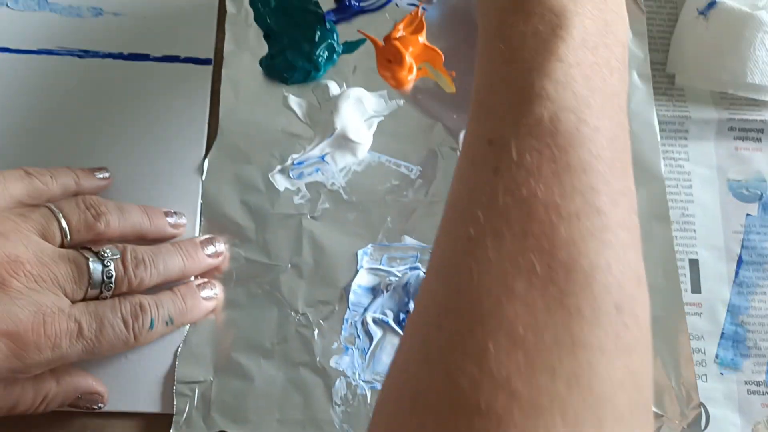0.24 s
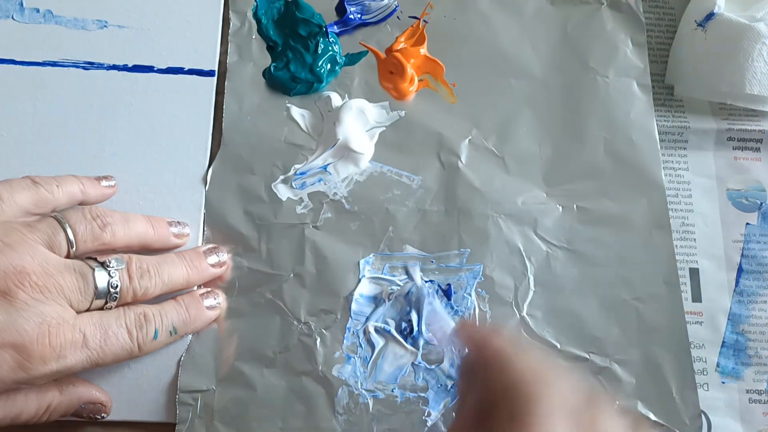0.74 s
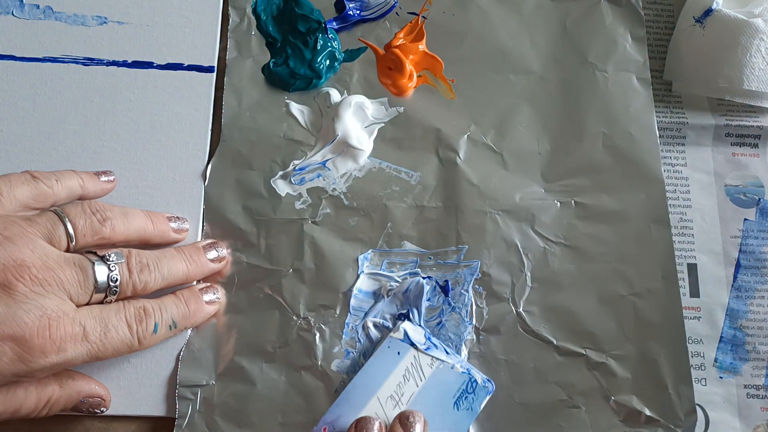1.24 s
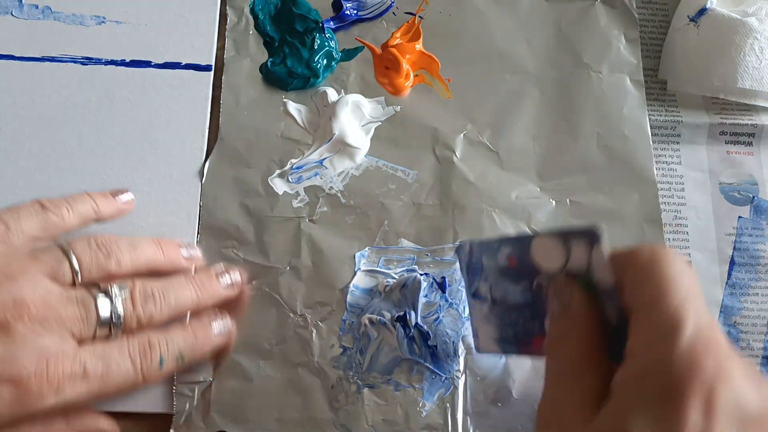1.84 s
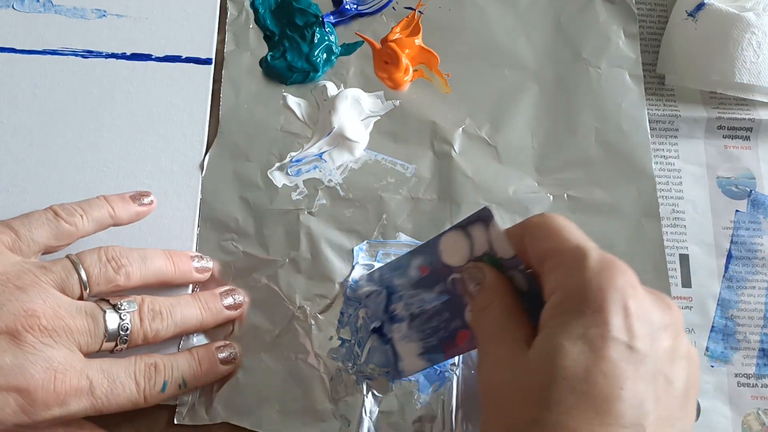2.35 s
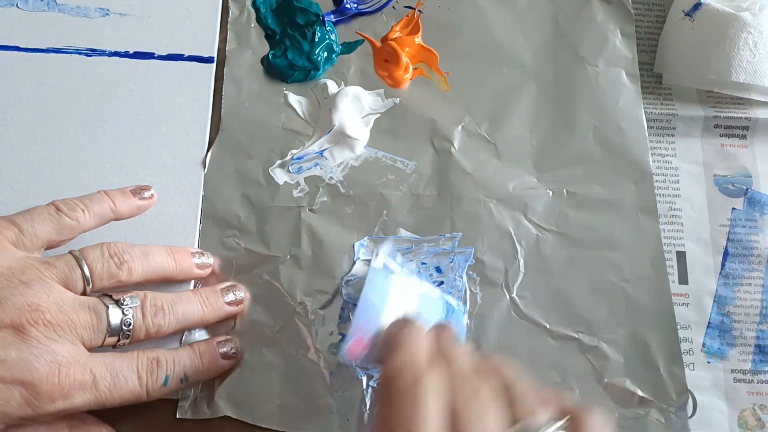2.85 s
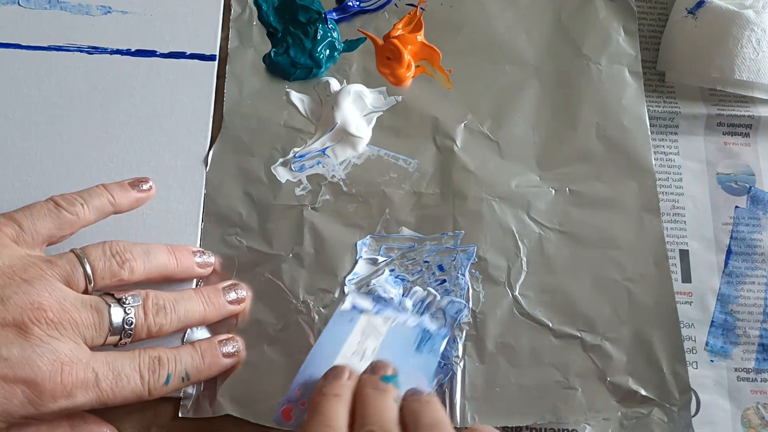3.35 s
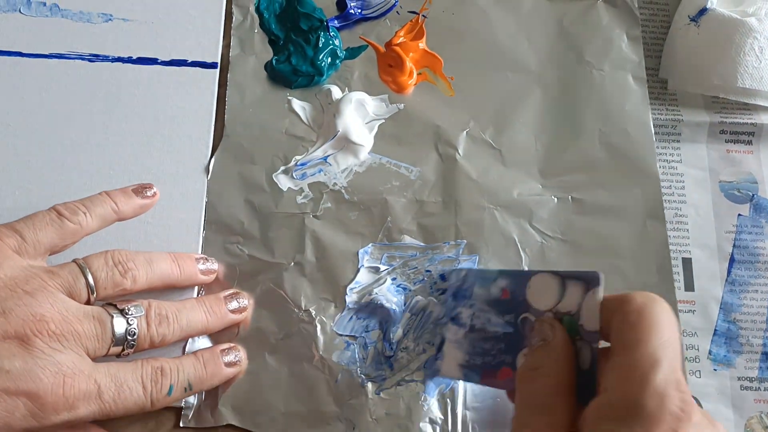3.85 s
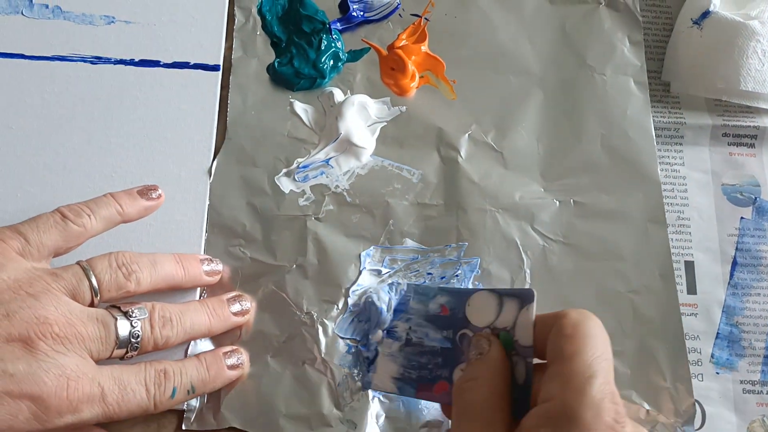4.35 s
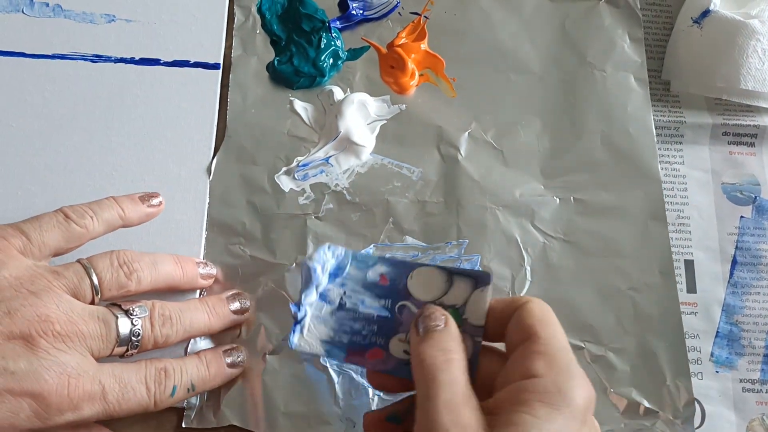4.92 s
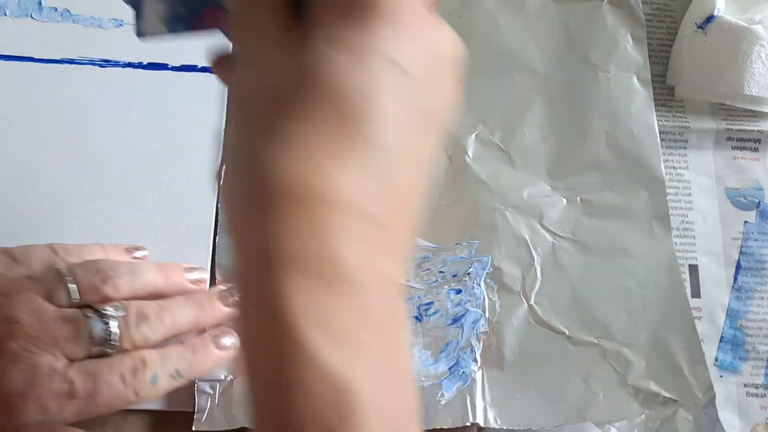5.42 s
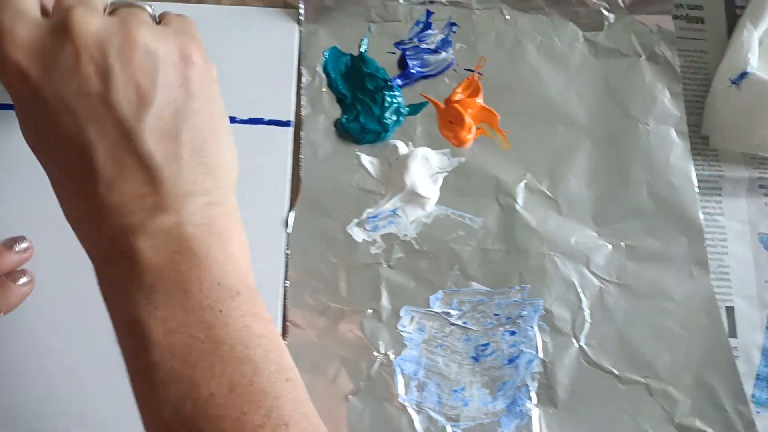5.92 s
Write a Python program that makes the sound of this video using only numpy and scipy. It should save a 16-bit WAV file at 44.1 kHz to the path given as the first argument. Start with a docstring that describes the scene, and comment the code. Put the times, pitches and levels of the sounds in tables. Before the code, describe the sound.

Foil buckles and crackles under a plastic card pushing wet paint over it, on a table indoors, heard from close by with short, tight reflections. Small rustles come first, then faint rubbing, then bursts of crisp snapping that build and stop abruptly as the card lifts. Dull clacks and tiny squeaks mix in. After the busiest run of snaps comes one last hard scuff, then only sticky ticks, low room rumble and faint hum.

```python
"""In a small room, a plastic card scrapes wet paint off a sheet of aluminium foil on a table.
In each stroke the card bites, presses harder or eases off, and lifts. The foil buckles in loud snaps
and a fine crackle, made of decaying noise bursts with a ring; the card's edge adds a duller rub of
ringing catches, and taps, squeaks, brushes and sticky ticks are resonated noise.
Decaying noise stands for the reflections; mains hum and a low rumble lie underneath."""
import sys
import numpy as np
from scipy import signal
from scipy.fft import rfft, irfft
from scipy.io import wavfile
from scipy.ndimage import uniform_filter1d

SR = 44100
rng = np.random.default_rng(int(sys.argv[2]) if len(sys.argv) > 2 else 0)


def to_wav(s):
    """Save 16-bit WAV."""
    ch = np.atleast_2d(s).T  # columns
    pcm = np.round(np.clip(ch, -1, 1) * 32767)  # PCM
    wavfile.write(sys.argv[1], SR, pcm.astype(np.int16))


N = 272538
TIME = np.arange(N) / SR  # s

# Strokes of the card. Each row: start in seconds, length in seconds, relative crackle level in dB,
# relative rub level in dB, change of pressure from start to end in dB.
CARD_STROKES = [(0.0, 0.012, -29, -32, -8.5), (0.073, 0.043, -33, -32, 5), (0.232, 0.066, -48.5, -36.5, -5),
                (0.32, 0.02, -36, -30.5, 2.5), (1.039, 0.1, -66, -50, -24), (1.14, 0.15, -63.5, -42.5, 3.5),
                (1.375, 0.21, -56, -39, 1.5), (1.658, 0.068, -24.5, -30, -10), (1.795, 0.13, -45, -72, 7),
                (1.973, 0.16, -29, -35, 12), (2.193, 0.085, -30, -29.5, -3), (2.332, 0.14, -49, -42, 4),
                (2.422, 0.13, -45, -36, -10), (2.609, 0.023, -31.5, -30, -0.5),
                (2.986, 0.165, -33.5, -41.5, -9), (3.188, 0.09, -48, -35, 3),
                (3.502, 0.027, -39.5, -30, -2), (3.575, 0.026, -50.5, -33, 13.5),
                (3.96, 0.071, -31, -29, -5.5), (4.067, 0.098, -37.5, -38, 5),
                (4.215, 0.18, -52, -50.5, 3.5), (4.383, 0.31, -45, -37.5, 7.5), (4.735, 0.085, -44, -44, 0),
                (4.839, 0.17, -40, -35.5, 16.5), (5.03, 0.13, -49.5, -42.5, -8),
                (5.12, 0.16, -28.5, -30.5, 5.5), (5.229, 0.033, -23.5, -24, -5.5),
                (5.416, 0.065, -42, -44, 10), (5.54, 0.045, -44.5, -32.5, -5.5),
                (5.937, 0.11, -72, -64.5, -11)]
# The sound builds as the card takes hold and dies quickly once it lifts.
BITE_DB_PER_S, LIFT_DB_PER_S = 1291, 528
# Then the sheet relaxes with a faint, slower rustle.
SETTLE_DB, SETTLE_DB_PER_S = -19.5, 130.5

# The loudest creases that snap through. Each row: start in seconds, relative level in dB.
LOUD_SNAPS = [(0.018, -15), (1.257, -21), (1.4508, -23.5), (1.497, -18), (1.6556, -8.5), (1.665, -6),
              (1.837, -15.5), (1.8802, -22.5), (1.981, -13.5), (2.027, -17), (2.0768, -10), (2.091, -7),
              (2.1011, -12.5), (2.1306, -10.5), (2.1705, -18.5), (2.217, -14), (2.357, -27),
              (2.4625, -12.5), (2.4885, -9.5), (2.5285, -8), (2.5535, -16), (2.5721, -9), (2.5947, -17),
              (2.663, -10.5), (2.9836, -14.5), (3.054, -12.5), (3.0853, -9.5), (3.1003, -26), (3.119, -10),
              (3.178, -20), (3.1926, -17.5), (3.2151, -25), (3.2452, -14), (3.494, -24.5), (3.5142, -6),
              (3.531, -20), (3.591, -24), (3.6073, -15), (3.9969, -6.5), (4.0332, -5.5), (4.0897, -12.5),
              (4.1405, -20.5), (4.2643, -15), (4.3735, -22), (4.392, -15), (4.4164, -10), (4.4381, -11.5),
              (4.4508, -12), (4.468, -13.5), (4.496, -5.5), (4.5013, -4.5), (4.5334, -19), (4.5494, -24),
              (4.5703, -3.5), (4.6363, -13.5), (4.672, -14.5), (4.744, -23), (4.8184, -9), (4.836, -12.5),
              (4.883, -10), (4.902, -16), (4.919, -7.5), (4.927, -12.5), (4.9811, -10.5), (5.0002, -15),
              (5.101, -14.5), (5.132, -11), (5.1466, -8.5), (5.1616, -8.5), (5.2113, -20), (5.4474, -11)]
# Buckles that run on through their neighbours. Each row: start in seconds, relative level of the
# first crease in dB.
BUCKLE_CASCADES = [(0.079, -15.5), (0.1197, -16), (0.2593, -16), (1.5354, -18), (1.587, -5.5),
                   (2.6437, -11.5), (4.872, -13), (5.2356, -6), (5.471, -15.5)]
CASCADE_GAP_S, CASCADE_DB_PER_S = 0.002, 598  # mean gap; the later a crease, the weaker
# The card's resonance, wandering with its grip and angle. Each row: time in seconds, mean pitch in Hz.
CARD_RESONANCE = [(0.3, 3410), (1.45, 2580), (1.7, 3350), (2.55, 3710), (3.0, 2810), (3.7, 2300),
                  (4.5, 3520), (4.7, 2705), (5.55, 2440)]
# Dull taps of card and fingers on the foil. Each row: start in seconds, relative level in dB, pitch in Hz.
FOIL_TAPS = [(0.239, -24.5, 2440), (1.0293, -27, 1170), (1.0297, -20.5, 1680), (1.267, -26, 2900),
             (1.378, -25, 2305), (1.393, -28, 2200), (1.408, -25.5, 2080), (2.097, -14, 854),
             (2.165, -18, 1080), (2.333, -22.5, 2030), (2.986, -11, 2340), (3.932, -22.5, 2200),
             (4.3015, -28, 1700), (4.819, -16, 1270), (5.539, -23, 2490)]
# Short squeaks of the card's edge. Each row: start in seconds, relative level in dB, pitch in Hz.
EDGE_SQUEAKS = [(1.178, -34.5, 3130), (1.31, -37, 2460), (2.265, -24, 2230), (2.427, -29, 2410),
                (3.366, -37, 2640), (3.71, -39, 2700)]
# Card and fingers barely brush the foil. Each row: start in seconds, relative level in dB, pitch in Hz.
LIGHT_BRUSHES = [(0.688, -49.5, 7400), (3.783, -47, 8550)]
# Small sticky ticks of wet paint. Each row: start in seconds, relative level in dB, pitch in Hz.
PAINT_TICKS = [(0.6664, -50, 6600), (0.9675, -52.5, 5400), (2.9325, -48, 5960), (5.686, -32.5, 9600),
               (5.7375, -31, 5700)]

# Filter for the bright foil. Each row: frequency in Hz, gain in dB.
FOIL_SPECTRUM = [(150, -48), (600, -22.5), (850, -19.5), (1150, -14), (1700, -4.5), (2500, -0.5),
                 (16000, -2)]
# Filter for the duller rub and taps. Each row: frequency in Hz, gain in dB.
RUB_SPECTRUM = [(200, -80), (750, -24.5), (1200, -15.5), (2300, -4.5), (6500, -1.5), (16000, -22.5)]
# Decay of the room. Each row: frequency in Hz, time to fall by 60 dB in seconds.
ROOM_DECAY = [(5600, 0.25), (14700, 0.11)]
# Filter for the room's reflections. Each row: frequency in Hz, gain in dB.
ECHO_SPECTRUM = [(300, -6), (2500, 0), (6500, -3), (16000, -2)]
# Spectrum of the room's rumble and hiss. Each row: frequency in Hz, relative level in dB.
RUMBLE_SPECTRUM = [(20, -3.5), (125, -11.5), (220, -9), (350, -17), (800, -25.5), (2000, -26.5),
                   (3300, -35), (16000, -46)]
# Left-right likeness of the rumble. Each row: frequency in Hz, likeness from 0 to 1.
RUMBLE_LIKENESS = [(25, .3), (100, 0.8), (300, 0.83), (1500, 0.14)]
# Mains hum. Each row: frequency in Hz, rms level at the microphones in dB.
MAINS_HUM = [(100, -66), (200, -70.5), (300, -74.5)]
# The ports of the two microphones resonate at different pitches. Each row: frequency in Hz, gain in dB.
LEFT_PORT = [(700, 0), (1100, -1), (2100, 4.5), (2570, 5), (2950, 0), (5200, 3.5), (6000, 9), (6800, 8.5),
             (7700, 0.5), (8500, -7), (9700, 4.5), (13000, 3.5), (14200, 10.5)]
RIGHT_PORT = [(700, 0), (1200, 3), (2000, -8.5), (2700, -2.5), (3500, 4), (4800, -2), (6600, -5),
              (7900, 4.5), (10000, 5.5), (12500, -1), (14200, -8.5), (16000, -19.5)]
EDGE_HZ = 15950  # upper band limit of the recorder


def pressure(start, length, change_db):
    """Stick and release: the level in dB climbs at the bite, slopes while held, and falls in two stages."""
    before = np.maximum(start - TIME, 0)
    after = np.maximum(TIME - start - length, 0)
    hold_db = change_db * (np.clip((TIME - start) / length, 0, 1) - .5)
    release_db = np.maximum(-LIFT_DB_PER_S * after, SETTLE_DB - SETTLE_DB_PER_S * after)
    return hold_db + release_db - BITE_DB_PER_S * before


def drag():
    """Frictional drive: the strongest stroke rules at each moment; returns crackle and rub gains."""
    drive_db = np.full((2, N), -np.inf)
    for start, length, crackle_db, rub_db, change_db in CARD_STROKES:
        stroke_db = np.array([[crackle_db], [rub_db]]) + pressure(start, length, change_db)
        drive_db = np.maximum(drive_db, stroke_db)
    return gain_of(drive_db)


def crease(t60, low_hz=2500, high_hz=15000, width_hz=900, crack_db=5, crack_s=0.0037,
           rise_s=0.00033, ring_db=6, size=4000):
    """Snap-through buckling: a facet cracks, rings at its own pitch, and scatters waves in the sheet."""
    t = np.arange(size) / SR
    scatter = gain_of(-60 * t / t60)
    crack = gain_of(crack_db) * np.exp(-t / crack_s)
    shape = (scatter + crack) * (1 - np.exp(-t / rise_s))
    burst = pair(size) * shape / shape.max()
    pitch_hz = low_hz * (high_hz / low_hz) ** rng.random()
    return burst + gain_of(ring_db) * facet(burst, pitch_hz, width_hz)


def snaps(level_db=-11.0, crack_db=7, ring_db=7, count=10):
    """Cascading instability: loud creases snap alone or set off a run of weaker neighbours."""
    out = np.zeros((2, N))
    creases = list(LOUD_SNAPS)
    for s, db in BUCKLE_CASCADES:
        delays = CASCADE_GAP_S * (np.arange(count) + rng.random(count) - .5).clip(0)
        creases += [(s + delay, db - CASCADE_DB_PER_S * delay) for delay in delays]
    for s, db in creases:
        t60 = rng.uniform(.014, .034)
        add(out, s, gain_of(db) * crease(t60, crack_db=crack_db, ring_db=ring_db))
    return gain_of(level_db) * colour(out, FOIL_SPECTRUM)


def crinkle(per_s, spread_db, creases, spectrum, size=1500):
    """Crackling noise: small creases at random times, mostly faint and a few large, partly levelled."""
    out = np.zeros((2, N))
    for when, luck, kind in rng.random((int(per_s * N / SR), 3)):
        gain = gain_of(-spread_db * np.log(luck + 0.11))
        add(out, when * N / SR, gain * creases[int(kind * len(creases))])
    out = evened(colour(out, spectrum))
    # the card releases strain at a steady pace: a large crease relieves its neighbours
    local_power = uniform_filter1d((out ** 2).mean(0), size)
    return out / np.sqrt(local_power + 0.023)


def crackle(drive, level_db=-2.5, per_s=260, spread_db=7.5, count=60):
    """Fine buckling: bright little creases give way as the paint drags the foil along."""
    creases = [crease(rng.uniform(.008, .026), size=1500) for _ in range(count)]
    return gain_of(level_db) * crinkle(per_s, spread_db, creases, FOIL_SPECTRUM) * drive


def rub(drive, level_db=-4.5, per_s=150, spread_db=8.0, t60=0.038, card_db=1, card_width_hz=700, count=60):
    """Friction and forced resonance: the edge catches on dull-ringing wrinkles and sets the card ringing."""
    creases = [crease(t60 * (.5 + rng.random()), low_hz=1070, high_hz=5130, width_hz=520,
                      ring_db=12.5, size=1500) for _ in range(count)]
    catches = crinkle(per_s, spread_db, creases, RUB_SPECTRUM)
    # random flexing of the pitch, 10 percent rms
    flex = 1 + .1 * evened(uniform_filter1d(rng.standard_normal(N), size=1200))
    card_hz = np.interp(TIME, *np.transpose(CARD_RESONANCE)) * flex
    card = resonate(catches, card_hz, card_width_hz)
    return gain_of(level_db) * evened(catches + gain_of(card_db) * card) * drive


def taps(level_db=-8.5, t60=0.057, width_hz=400, ring_db=17):
    """Impact excitation: the sheet is pushed against the table with a short, dull clack."""
    out = np.zeros((2, N))
    for s, db, hz in FOIL_TAPS:
        clack = crease(t60, low_hz=hz, high_hz=hz, width_hz=width_hz, ring_db=ring_db)
        add(out, s, gain_of(db) * clack)
    return gain_of(level_db) * colour(out, RUB_SPECTRUM)


def chirps(rows, peak_s, width_hz, size=3000):
    """Adhesive release: a noise pulse, swelling until peak_s, passes twice through one resonance."""
    out = np.zeros((2, N))
    u = np.arange(size) / SR / peak_s
    for s, db, hz in rows:
        pulse = pair(size) * u * np.exp(-u)
        chirp = facet(facet(pulse, hz, width_hz), hz, width_hz)
        add(out, s, gain_of(db) * chirp / abs(chirp).max())
    return out


def room(x, wet_db=-5.5, build_s=0.0019, count=18000):
    """Reverberation: dense reflections from table and near walls, each band dying at its own speed."""
    hz, t, z = signal.stft(rng.standard_normal((2, count)), SR, nperseg=256)
    decay = gain_of(-60 * t / read(ROOM_DECAY, hz)[:, None])
    tail = signal.istft(z * decay, SR)[1]
    tail *= 1 - np.exp(-np.arange(tail.shape[1]) / SR / build_s)
    tail = colour(tail / np.linalg.norm(tail[0]), ECHO_SPECTRUM)
    return gain_of(wet_db) * signal.fftconvolve(x, tail, axes=1)[:, :N]


def roaming_room(x, count=4):
    """Position-dependent reflection: creases spring up all over the sheet, so four echo patterns alternate."""
    turn = 2 * np.pi * 7 * TIME  # the weights swing at 7 Hz and 14 Hz
    weights = [np.cos(turn * (k // 2 + 1) + k * np.pi / 2) for k in range(count)]
    return sum(room(x * weight) for weight in weights) * np.sqrt(2 / count)


def background(rumble_db=-60):
    """Stationary noise and harmonic hum: partly shared rumble and hiss, with steady mains sines."""
    hz = np.fft.rfftfreq(N, 1 / SR)
    left, other = rfft(rng.standard_normal((2, N)))
    same = read(RUMBLE_LIKENESS, hz)
    right = same * left + np.sqrt(1 - same ** 2) * other
    air = irfft(np.array([left, right]) * gain_of(read(RUMBLE_SPECTRUM, hz)), N)
    hum = sum(gain_of(db) * np.sqrt(2) * np.sin(2 * np.pi * (f * TIME + rng.random()))
              for f, db in MAINS_HUM)
    return gain_of(rumble_db) * evened(air) + hum


def pair(count, same=0.2, lead=4):
    """Partial coherence: noise shared in part by two microphones, reaching the left some samples later."""
    left, other = rng.standard_normal((2, count))
    return np.array([left, same * np.roll(left, -lead) + np.sqrt(1 - same ** 2) * other])


def facet(x, hz, width_hz):
    """Simple resonance: one broad peak of gain 1."""
    return signal.lfilter(*signal.iirpeak(hz, hz / width_hz, fs=SR), x)


def resonate(x, hz, width_hz):
    """Heterodyne resonance: a peak of gain 1 that follows the curve hz."""
    turn = np.exp(2j * np.pi * np.cumsum(hz) / SR)
    r = np.exp(-np.pi * width_hz / SR)
    return 2 * (turn * signal.lfilter([1 - r], [1, -r], x / turn)).real


def colour(x, points, size=2048):
    """Minimum-phase filtering: a causal filter with the given spectrum in dB."""
    log_gain = np.log(gain_of(read(points, abs(np.fft.fftfreq(size, 1 / SR)))))
    impulse = np.fft.ifft(np.exp(np.conj(signal.hilbert(log_gain)))).real
    return signal.oaconvolve(x, impulse[None, :size // 2], axes=1)[:, :x.shape[1]]


def read(points, hz):
    """Logarithmic pitch scale: reads a table by interpolating over log frequency."""
    f, value = np.transpose(points)
    return np.interp(np.log(hz + 1), np.log(f + 1), value)


def gain_of(db):
    """Decibel law: decibels to amplitude."""
    return 10 ** (np.asarray(db) / 20)


def evened(x):
    """Mean power: scales to rms 1."""
    return x / np.sqrt(np.mean(x ** 2) + 1e-20)


def add(mix, s, sound):
    """Superposition: adds a stereo sound at time s in seconds."""
    part = mix[:, round(s * SR):][:, :sound.shape[1]]
    part += sound[:, :part.shape[1]]


def scene():
    """Direct and reflected sound: foil and card in a small room; threads of paint part close by."""
    crackle_drive, rub_drive = drag()
    foil = snaps() + taps() + crackle(crackle_drive) + rub(rub_drive)
    foil = foil + chirps(EDGE_SQUEAKS, peak_s=0.0047, width_hz=1100)
    foil = foil + chirps(LIGHT_BRUSHES, peak_s=0.0054, width_hz=10400)
    ticks = chirps(PAINT_TICKS, peak_s=0.00093, width_hz=6200)
    reflections = roaming_room(foil + gain_of(-9) * ticks)  # the close ticks excite the room less
    return foil + ticks + reflections + background()


def record(dry):
    """Transducer response: each microphone's colour, then the recorder's band limit."""
    heard = np.vstack([colour(dry[:1], LEFT_PORT), colour(dry[1:], RIGHT_PORT)])
    low_pass = signal.firwin(255, EDGE_HZ, window=("kaiser", 9), fs=SR)
    return signal.oaconvolve(heard, low_pass[None], "same")


dry = scene()
out = record(dry)
to_wav(out)
```